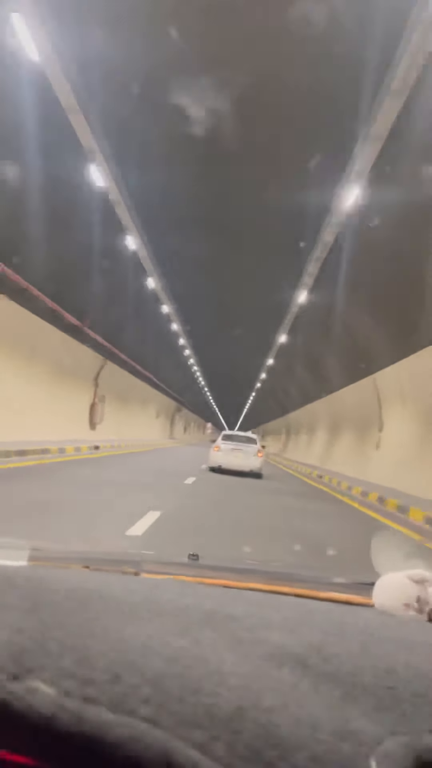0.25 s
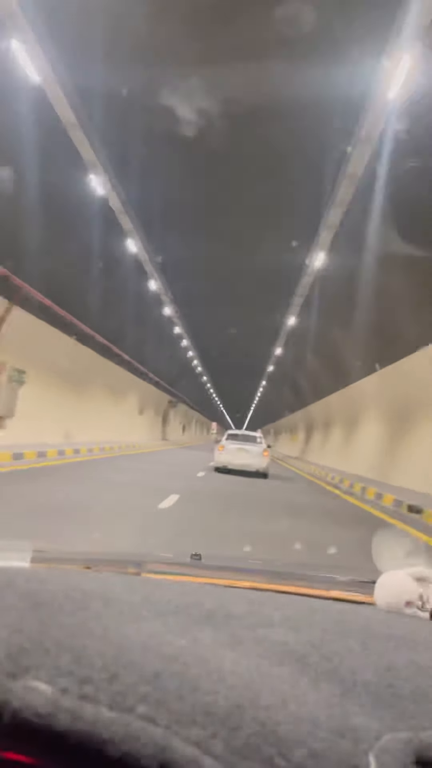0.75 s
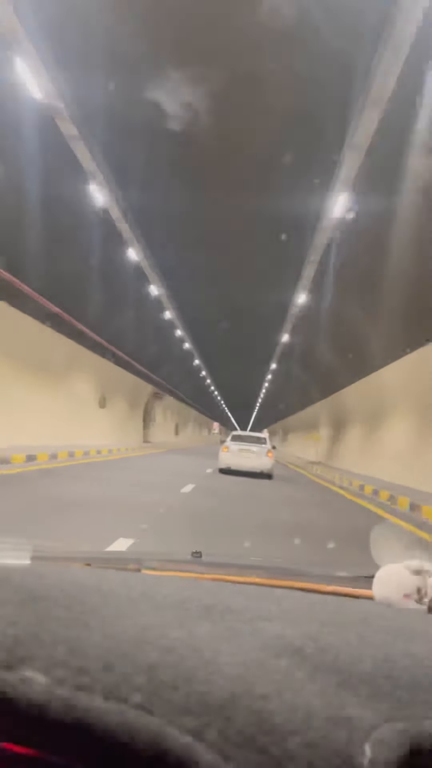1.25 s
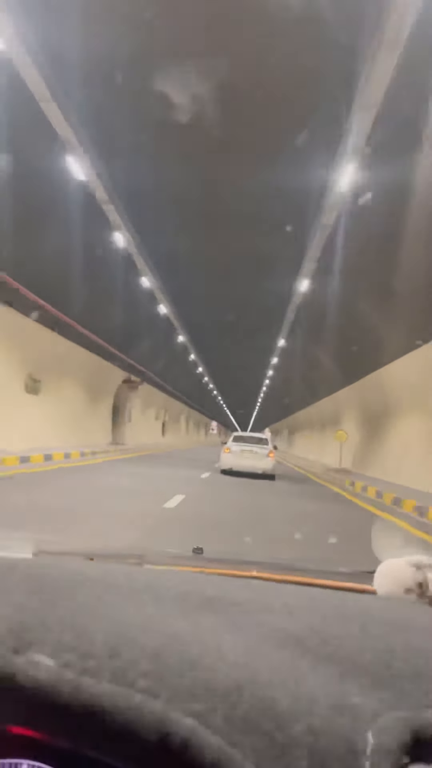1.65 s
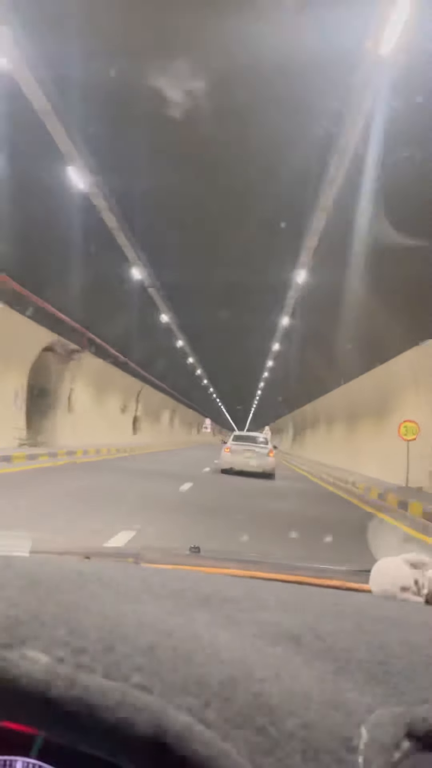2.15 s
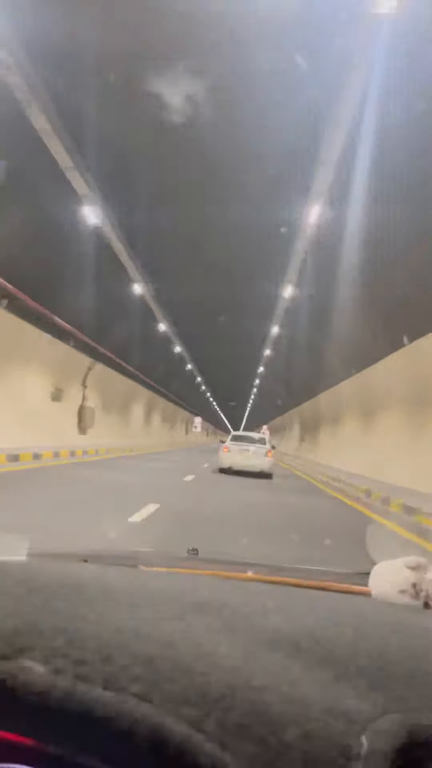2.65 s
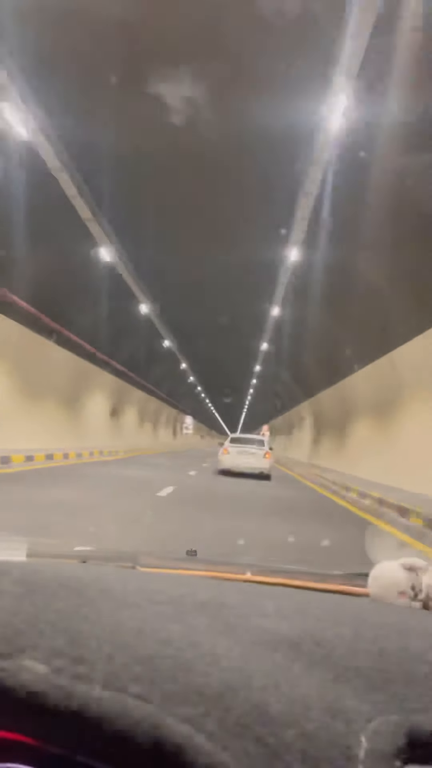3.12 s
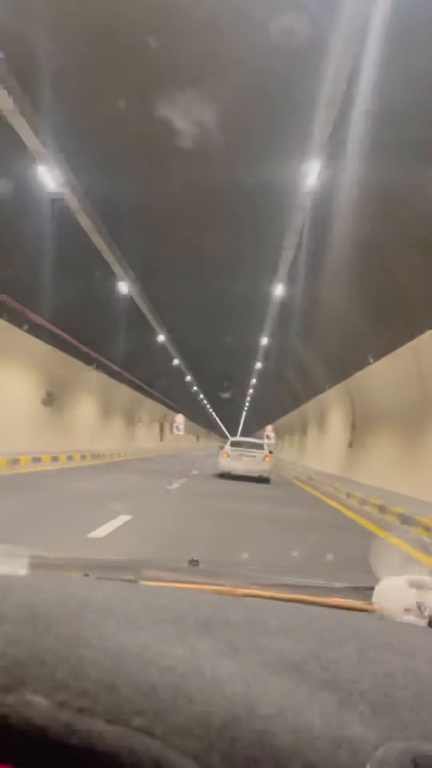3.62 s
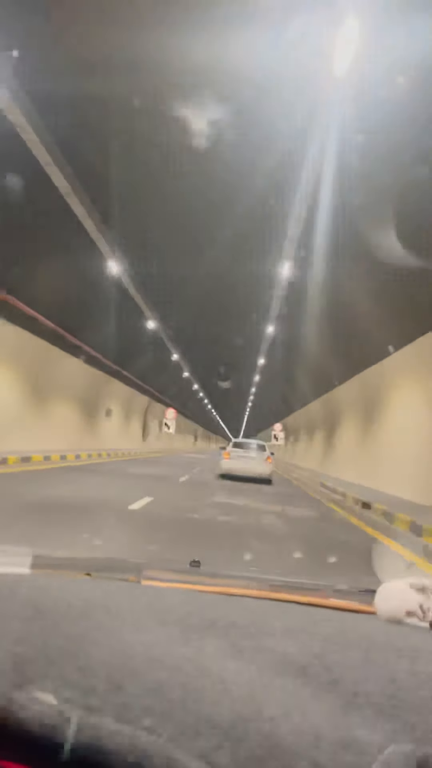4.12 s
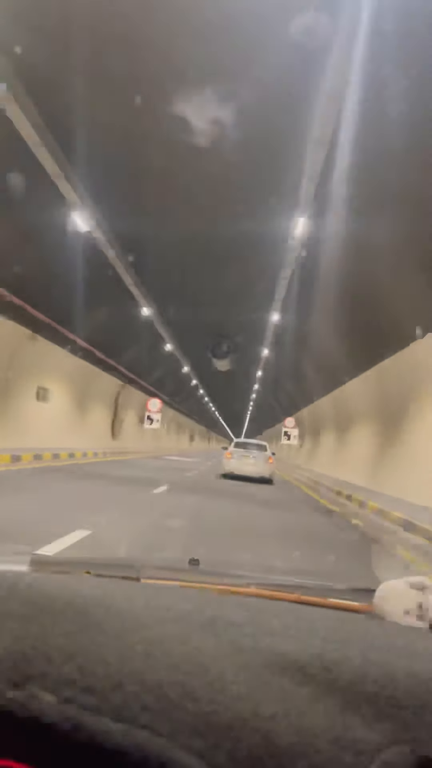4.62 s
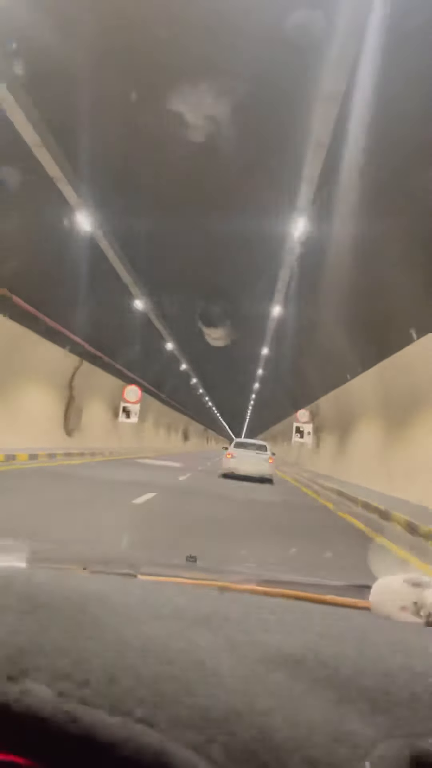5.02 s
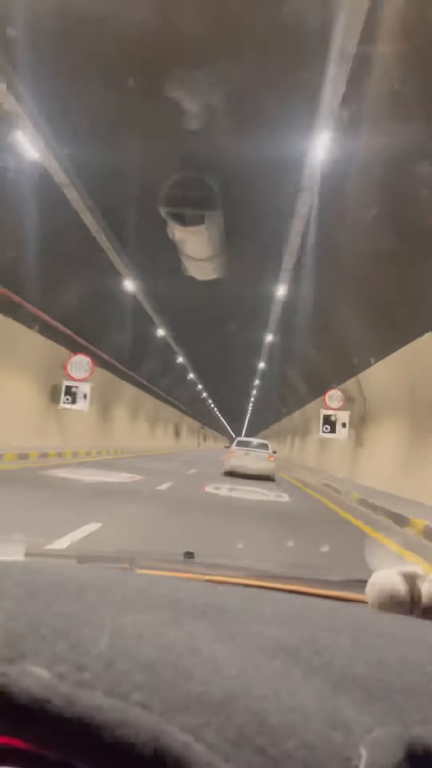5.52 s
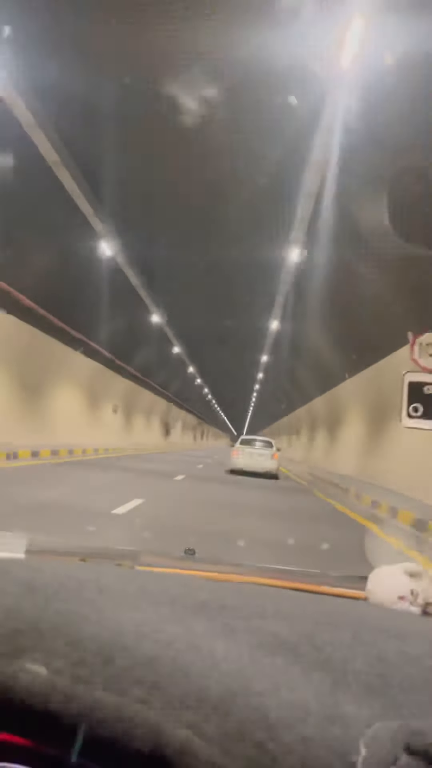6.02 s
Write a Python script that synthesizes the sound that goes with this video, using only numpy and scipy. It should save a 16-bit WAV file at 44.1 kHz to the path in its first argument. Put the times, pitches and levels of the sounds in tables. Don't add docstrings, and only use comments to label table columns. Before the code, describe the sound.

Steady low road rumble fills a car cabin in a long tunnel, while loose plastic buzzes, ticks, snaps once and finally creaks near the dashboard.

```python
import sys
import numpy as np
from scipy import signal
from scipy.fft import rfft, irfft
from scipy.io import wavfile
from scipy.ndimage import uniform_filter1d

SR = 44100
rng = np.random.default_rng(int(sys.argv[2]) if len(sys.argv) > 2 else 0)


def to_linear_factor(level_db):
    exponent = np.asarray(level_db, float) / 20
    return 10 ** exponent


def file_out(sig):
    cols = np.atleast_2d(sig).T
    lim = np.clip(cols, -1, 1)
    pcm = np.round(lim * 32767).astype(np.int16)
    wavfile.write(sys.argv[1], SR, pcm)


N = 276066


def rms_one(x):
    return x / np.sqrt(np.mean(x ** 2) + 1e-20)


def in_time(rows):
    s, *columns = np.transpose(rows)
    return [np.interp(np.arange(N) / SR, s, c) for c in columns]


def at_hz(points, hz):
    point_hz, values = np.transpose(points)
    return np.interp(np.log(hz), np.log(point_hz), values)


def bins():
    return np.maximum(np.arange(N // 2 + 1) * SR / N, 1)


def drift(rate):
    r = np.exp(-80 * np.pi * rate / SR)
    warm_up = 2000
    noise = rng.standard_normal(N // 40 + 2 + warm_up)
    slow = signal.lfilter([1], [1, -2 * r, r * r], noise)[warm_up:]
    return np.interp(np.arange(N) / 40, np.arange(len(slow)), rms_one(slow))


def swells(rows):
    t = np.arange(0, N, 64) / SR
    coarse = sum(lift_db * np.exp(-((t - s) / half) ** 2) for s, lift_db, half in rows)
    return np.interp(np.arange(N) / SR, t, coarse)


def evened(x, share, span):
    power = uniform_filter1d(np.mean(x ** 2, axis=0), round(span * SR))
    return rms_one(x / (power + 0.031) ** (share / 2))


def ring(clicks, hz, t60):
    r = to_linear_factor(-60 / (t60 * SR))
    w = 2 * np.pi * hz / SR
    return signal.lfilter([0, np.sin(w)], [1, -2 * r * np.cos(w), r * r], clicks + 1e-18)


def at_ports(common, left, right, hz):
    # pitch_hz, share (0-1)
    likeness = [(60, 0.98), (320, 0.98), (550, 0.9), (950, 0.83), (1660, .8), (2300, 0.65), (2700, 0.3),
                (7000, 0)]
    # pitch_hz, left_over_right_db
    level_tilt = [(60, 1.0), (92, 1), (140, 1), (220, 0), (340, 2), (520, 3), (790, 4), (1220, -1),
                  (1870, 0.5), (2880, -0.5)]
    # pitch_hz, lead_radians
    left_leads = [(30, 0.015), (300, 0.017), (750, -0.6), (1200, 0.41), (1890, 0.86), (2330, -1.2),
                  (2760, -0.48), (7000, 0)]
    alike = at_hz(likeness, hz)
    turn = np.exp(.5j * at_hz(left_leads, hz))
    tilt = to_linear_factor(at_hz(level_tilt, hz) / 2)
    shared = np.sqrt(alike) * common
    own = np.sqrt(1 - alike)
    return np.array([tilt * (shared * turn + own * left), (shared / turn + own * right) / tilt])


def from_side(x, left, right, diffuse, lag=1 / 5800):
    late = irfft(rfft(x) * np.exp(-2j * np.pi * bins() * lag), N)
    return np.array([x + diffuse * left, late + diffuse * right])


def path_level(hz, level_db, share):
    # start_s, level_db (about the mean)
    surface = [(0, -1), (.2, 1.5), (.5, -1.5), (1.2, -0.5), (1.6, -1.5), (1.9, -0.7), (2.15, -2.5),
               (2.6, -0.5), (3.4, -0.53), (4.0, -0.5), (4.3, 0), (4.8, -0.5), (5.4, -1.83), (5.8, -1.7),
               (6.04, -3), (6.14, 1.5), (6.26, 5)]
    # start_s, lift_db, pitch_hz
    bumps = [(0.175, -0.5, 111), (0.649, -2.5, 112.6), (0.813, 4, 113), (1.638, 3, 56), (1.811, 2.5, 162),
             (2.37, 5, 79.4), (2.704, -0.5, 164), (2.774, -2.5, 80), (3.168, 2.5, 162), (3.219, 1.5, 79),
             (3.382, 5, 114), (3.407, 4, 57), (3.657, 3.5, 55.7), (3.935, 3.5, 116), (4.052, 10, 109.3),
             (4.485, 2.5, 112), (4.809, 7.5, 166), (4.934, 7, 56.6), (5.004, 2.5, 156.5), (5.168, -5, 230),
             (5.218, 5, 80), (5.273, 1.5, 226), (5.423, 7, 58), (5.707, 4, 160), (5.722, 0.5, 57),
             (5.891, 5, 57.6), (6.251, -3, 164), (6.256, 0, 80.2),
             (.55, 2.5, 347), (1.27, 1.5, 595), (1.0, 2.5, 332), (2.3, 0.5, 440), (2.79, 3, 602),
             (3.956, -3, 690), (4.17, -2, 400), (4.72, 4.5, 345), (4.9, 2.5, 328), (5.28, -1.5, 350),
             (5.95, -0.5, 300), (6.17, 0.5, 300)]
    # start_s, lift_db, pitch_hz
    slow_swells = [(.05, -3, 50), (.35, 6, 35.7), (.45, -6, 55), (.62, 4, 330), (.83, -4.5, 40),
                   (1.1, 1.5, 560), (1.1, -2.5, 193), (1.25, -4, 49.8), (1.4, -1.5, 301), (1.75, -3.5, 38.2),
                   (2.15, 1, 40), (2.2, 2, 148), (2.5, 2.5, 167), (2.8, 0.5, 68.8), (3.15, -1, 79.7),
                   (3.25, 1, 182), (3.85, -2, 350), (4.05, -3.5, 152.6), (4.35, -6, 54.3), (4.55, -2, 232),
                   (5.001, 2, 80), (5.2, 5.5, 270), (5.65, 0.5, 70), (5.83, 1.5, 151), (6.2, -1.5, 50),
                   (6.2, -4.5, 106), (6.2, 1.5, 223), (3.0, 0.5, 150), (1.799, 3, 148.6), (0.599, 7, 104.7),
                   (4.249, 3, 270), (2.1, 3, 644), (2.8, -1, 647), (6.12, 1, 280), (6.13, -1, 105),
                   (2.75, 1, 75), (2.75, 3.5, 200), (.3, -5, 53), (5.7, 3, 75), (.6, 0.5, 400), (1.299, 0, 400),
                   (4.6, -0.5, 1500), (6.15, 2.5, 150), (3.95, 1, 105), (4.7, -1.5, 548), (.1, 0.5, 75),
                   (3.25, 0.5, 2000), (5.3, 2, 2000)]
    bump_half_s, slow_half_s, reach_octaves = .06, .11, .5
    rows = [(*row, bump_half_s) for row in bumps]
    rows += [(*row, slow_half_s) for row in slow_swells]
    near = []
    for s, lift_db, pitch, half in rows:
        reach = np.exp(-(np.log2(pitch / hz) / reach_octaves) ** 2)
        near.append((s, lift_db * reach, half))
    return level_db + share * in_time(surface)[0] + 1.34 * swells(near)


def road():
    # pitch_hz, level_db (per Hz)
    roar_colour = [(20, -36), (32, -7.5), (48, 4.5), (80, 3.5), (120, -3.5), (200, -15.5), (400, -26),
                   (650, -37), (1000, -35), (1700, -41.5), (3000, -50.5), (4600, -64), (7000, -80),
                   (8600, -120)]
    # pitch_hz, width_hz, lift_db
    cabin = [(103.24, 3.3, 7), (138, 20, -3), (174.7, 19, 6.5), (226.5, 16, -9), (259.5, 6.2, 4.5),
             (385, 94, 3.5), (536, 42, 6), (570, 24, -3), (710, 75, 5), (860, 100, 4), (1359, 310, 4.5),
             (1780, 75, -8.5), (1820, 28, -1.5), (3110, 63, -6.5), (4020, 470, 1.5)]
    path_edges = [55, 78, 110, 155, 220, 330, 480, 720, 1100]
    # pitch_hz, level_db, share (of the surface's swing)
    path_rows = [
        (42, -28, .05),
        (66.4, -26.5, 1.6),
        (82, -24.5, 3.43),
        (129, -27, 1.4),
        (185, -29.5, 0.3),
        (270, -34.5, 0.37),
        (400, -38.5, .3),
        (583, -40, 0.22),
        (880, -43.5, .2),
        (1990, -47.5, 0.2),
    ]
    hz = bins()
    colour_db = at_hz(roar_colour, hz)
    for f, width, db in cabin:
        colour_db = colour_db + db / (1 + (2 * (hz - f) / width) ** 2) ** 2
    ports = at_ports(*rfft(rng.standard_normal((3, N))), hz) * to_linear_factor(colour_db)
    below = [1 / (1 + (hz / edge) ** 16) for edge in path_edges]
    below = [0 * hz] + below + [1 + 0 * hz]
    roar = 0
    for row, low, high in zip(path_rows, below, below[1:]):
        band = rms_one(irfft(ports * (high - low), N))
        roar = roar + to_linear_factor(path_level(*row)) * evened(band, share=0.65, span=.12)
    return roar


def flexed(roar):
    # pitch_hz, width_hz, swing_db, trend_db_per_s
    flexing = [(185, 34, 1, -0.07), (318, 22, 3, -0.2), (400, 23, 0.5, 0.24), (556, 40, 1.6, -0.37),
               (705, 51, 1.8, -0.5), (840, 70, 1.95, 0.1)]
    from_middle_s = (np.arange(N) - N / 2) / SR
    out = roar.copy()
    for hz, width, swing_db, trend_db in flexing:
        r = np.exp(-np.pi * width / SR)
        poles = [1, -2 * r * np.cos(2 * np.pi * hz / SR), r * r]
        mode = signal.lfilter([(1 - r * r) / 2, 0, (r * r - 1) / 2], poles, roar)
        change_db = swing_db * drift(3.0) + trend_db * from_middle_s
        out += (to_linear_factor(change_db) - 1) * mode
    return out


def engine():
    # start_s, firings_per_s
    speed = [(0, 78.6), (1.67, 78.4), (4.4, 78.4), (6.26, 79.3)]
    # start_s, level_db
    load = [
        (0, 0.5),
        (1.5, -2),
        (2.2, 1),
        (4.4, -1.5),
        (6.26, 1.5),
    ]
    # multiple, level_db
    firing_orders = [(1, -28.5), (2, -35.5), (3, -38), (4, -42.5), (5, -50), (7, -55), (9, -63), (11, -64)]
    per_s, load_db = in_time(speed) + in_time(load)
    phase = 2 * np.pi * np.cumsum(per_s * (1 + .004 * drift(3))) / SR
    hum = np.zeros(N)
    for k, db in firing_orders:
        swell = to_linear_factor(db + 1.5 + load_db + 2.9 * drift(15.0))
        hum += swell * np.sin(k * phase + rng.uniform(0, 2 * np.pi))
    spectrum = rfft(hum)
    return irfft(at_ports(spectrum, spectrum, spectrum, bins()), N)


def panel():
    # start_s, lift_db
    panel_flares = [(.35, -1), (.8, 4), (1.519, 8), (1.66, 2.5), (2.04, 0), (2.67, 4), (3.42, 3),
                    (3.69, 6.5), (4.131, 7), (4.35, 1), (4.69, 4.5), (4.84, 2.5), (5.16, 4), (5.37, 5),
                    (5.75, 6), (6.009, 6.5), (6.125, 7.5), (6.165, 7), (6.235, 1.5)]
    panel_hz, width_hz, flare_half_s = 2295, 200, .03
    level_db, rise_db_per_s, flicker_db = -63.5, 1.1, 1.8
    hz = bins()
    peak = 1 / (1 + (2 * (hz - panel_hz) / width_hz) ** 2)
    sung = irfft(at_ports(*rfft(rng.standard_normal((3, N))), hz) * peak, N)
    flares_db = swells([(s, lift_db, flare_half_s) for s, lift_db in panel_flares])
    flares_db += flicker_db * drift(7.8)
    level = to_linear_factor(level_db + rise_db_per_s * np.arange(N) / SR + flares_db)
    return level * evened(rms_one(sung), share=0.4, span=0.042)


def buzz():
    # pitch_hz, level_db (per Hz)
    buzz_colour = [(4500, -12), (5800, 2.5), (7000, -4), (8500, -1), (10300, -10), (11300, -7.5),
                   (11800, -2.5), (12000, 1.5), (12300, -3.5), (12600, -29.5)]
    # start_s, lift_db, half_length_s
    shakes = [
        (.13, -2.5, 0.22),
        (2.5, 0, 0.23),
        (4.45, 0, 0.04),
        (4.78, 3, .12),
        (5.33, 7.5, 0.082),
        (5.72, 3, 0.072),
        (6.17, 6, 0.07),
    ]
    colour_db = at_hz([(3000, -49.0)] + buzz_colour, bins())
    near = irfft(rfft(rng.standard_normal((3, N))) * to_linear_factor(colour_db), N)
    flare_db = 3.5 * np.clip(drift(16), 0, 2)
    return to_linear_factor(-78.5 + swells(shakes) + flare_db) * rms_one(from_side(*near, diffuse=0.58))


def ticks():
    # start_s, peak_db, brightness_db_per_octave
    tick_rows = [(0.1137, -63, -5), (0.1685, -70, 6.5), (0.8736, -72, 9), (1.933, -54.5, 22),
                 (2.264, -65, 10), (2.369, -67, 5.5), (2.4363, -65, 3), (2.7153, -67, 2), (2.722, -63.5, 4),
                 (2.19, -69, 7), (2.335, -72, 8), (3.0549, -69, 8), (3.766, -63, -4), (4.7447, -70, 14),
                 (4.767, -64, 4), (4.834, -69, 1), (4.8937, -72, 9.5), (4.9555, -66, -4), (5.011, -67, 9),
                 (5.253, -73, 1), (5.315, -56, 13), (5.319, -56, 14), (5.3894, -51, 2), (5.396, -62, 5),
                 (5.6907, -76, 4.5), (5.7795, -70, -1), (6.1106, -69, -3), (6.115, -69, 8)]
    # pitch_hz, level_db, t60_s
    trim_modes = [(2790, -5, .05), (3580, -9, .04), (4200, -4, .05), (5680, -10, .05), (6400, -5, .05),
                  (6560, -3, .06), (7010, -4, .05), (7500, -2, .04), (8210, -5, .04), (8810, 0, .06),
                  (9700, -11, .03), (10200, 0, .06), (10800, -8, .04), (11420, 2, .07)]
    attack_s, contact_t60_s = .0003, .013
    lasting = .24 * .4
    near = np.zeros((3, N))
    luck = rng.standard_normal((len(tick_rows), 3, 1500))
    strengths = rng.standard_normal((len(tick_rows), len(trim_modes)))
    age = np.arange(1500) / SR
    envelope = (1 - np.exp(-age / attack_s)) * to_linear_factor(-60 * age / contact_t60_s)
    for (s, peak_db, tilt_db), chatter, strength in zip(tick_rows, luck, strengths):
        contact = chatter * envelope
        body = np.zeros((3, 1500))
        for (hz, db, t60), luck_db in zip(trim_modes, strength):
            mode_db = db + tilt_db * np.log2(hz / 7000) + luck_db
            body += to_linear_factor(mode_db) * ring(contact, hz, lasting * t60)
        start = round(s * SR)
        near[:, start:start + 1500] += to_linear_factor(peak_db + 10.0) * body / np.abs(body).max()
    soft_top = signal.cheby2(10, 40, 12300, fs=SR, output="sos")
    return from_side(*signal.sosfilt(soft_top, near), diffuse=.6)


def knocks():
    # start_s, peak_db, pitch_hz, t60_s
    knock_rows = [(2.790, -33, 620, .025), (3.956, -35, 700, .025), (5.3893, -39, 2790, .012),
                  (5.3900, -42, 2000, .005), (5.3893, -44, 3400, .004), (6.0910, -34, 2280, .025),
                  (6.0965, -44, 3000, .006), (6.1535, -38, 1390, .03), (6.1690, -39, 1450, .015),
                  (6.1672, -34, 2400, .004), (6.1672, -37, 3300, .003), (6.1672, -55, 4500, .004)]
    out = np.zeros(N)
    tap = signal.lfilter([.25, .5, .25], [1], np.arange(3000) == 0)
    for s, peak_db, hz, t60 in knock_rows:
        start = round(s * SR)
        out[start:start + 3000] += to_linear_factor(peak_db) * ring(tap, hz, t60)
    return signal.sosfilt(signal.butter(4, 6500, fs=SR, output="sos"), out)


def creaks():
    # start_s, peak_db, length_s, centre_hz
    creak_rows = [
        (4.415, -56, .035, 4800),
        (4.436, -54, .03, 4800),
        (4.462, -57, .025, 4500),
        (6.146, -39, .03, 1500),
        (6.088, -41, .014, 2200),
        (6.116, -43, .03, 2000),
    ]
    # start_s, peak_db, length_s, centre_hz
    squeak_rows = [
        (4.42, -64, .012, 7000),
        (4.441, -62, .01, 7600),
        (4.458, -64, .01, 6800),
        (6.11, -64, .008, 7200),
        (6.126, -62, .014, 7300),
        (6.218, -58, .01, 7400),
        (6.232, -64, .012, 7300),
    ]
    near = np.zeros((3, N))
    rows = [(*row, 1.4) for row in creak_rows] + [(*row, 1.15) for row in squeak_rows]
    luck = rng.standard_normal((len(rows), 3, 2000))
    for (s, peak_db, length, hz, reach), slips in zip(rows, luck):
        band = signal.butter(4, [hz / reach, hz * reach ** .6], "band", fs=SR, output="sos")
        stroke = np.sin(np.pi * np.minimum(np.arange(2000) / (length * SR), 1))
        burst = signal.sosfilt(band, slips * stroke)
        burst *= to_linear_factor(peak_db) / np.abs(burst[0]).max()
        start = round(s * SR)
        near[:, start:start + 2000] += burst[:, :N - start]
    return from_side(*near, diffuse=0.69, lag=0)


def snap():
    clip_modes = [(2790, -6, .004), (3600, -11, .002), (4250, -8, .003), (5700, -17, .004),
                  (6500, -8, .005), (7200, -7, .004), (8200, -11, .005), (8750, 1, .006), (10170, -6, .006),
                  (11430, -6, .008)]
    snap_s, settle_s, rebound_s = 5.3894, 5.4032, .000708
    snap_db, settle_db, rise_db, loss_db = -34, -50, 1.0, 2.1
    k = np.arange(14)
    jitter = .12 * np.abs(rng.standard_normal(len(k)))
    s = np.append(snap_s + rebound_s * (k + jitter), [settle_s, settle_s + rebound_s])
    db = snap_db + rise_db * np.minimum(k, 3) - loss_db * np.maximum(k - 3, 0)
    db = np.append(db, [settle_db] * 2)
    start = round(snap_s * SR)
    places = np.round(s * SR).astype(int) - start
    near = np.zeros((3, N))
    strengths = rng.standard_normal((len(clip_modes), 3, len(s)))
    for (hz, mode_db, t60), luck in zip(clip_modes, strengths):
        clicks = np.zeros((3, 3000))
        clicks[:, places] = to_linear_factor(db + mode_db) * np.array([1 + .3 * luck[0], luck[1], luck[2]])
        near[:, start:start + 3000] += ring(clicks, hz, t60)
    soft_top = signal.cheby2(10, 40, 12300, fs=SR, output="sos")
    return from_side(*signal.sosfilt(soft_top, near), diffuse=.3)


def scene():
    roar = flexed(road())
    return roar + engine() + panel() + buzz() + ticks() + knocks() + creaks() + snap()


def band_limit(x):
    return signal.sosfilt(signal.butter(12, 12400, fs=SR, output="sos"), x)


def record(dry):
    closing_s = .0004
    to_end = np.minimum(np.arange(N)[::-1] / (closing_s * SR), 1)
    closing = np.sin(np.pi / 2 * to_end) ** 2
    return band_limit(closing * np.tanh(dry))


dry = scene()
out = record(dry)
file_out(out)
```